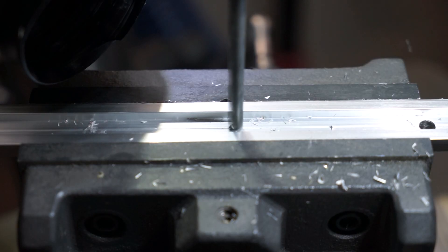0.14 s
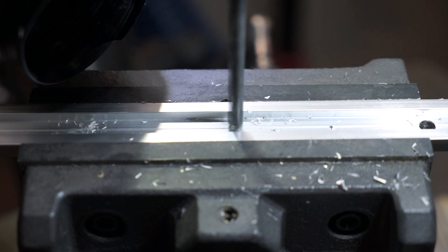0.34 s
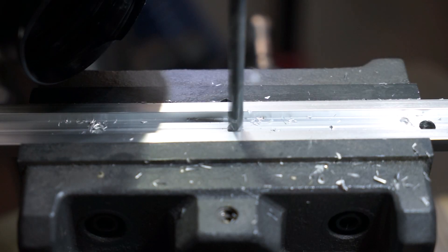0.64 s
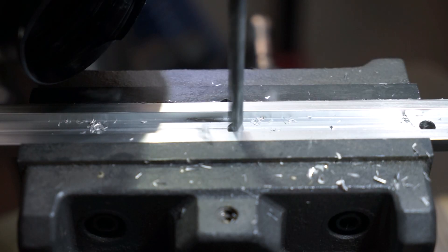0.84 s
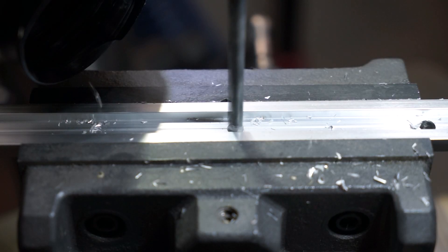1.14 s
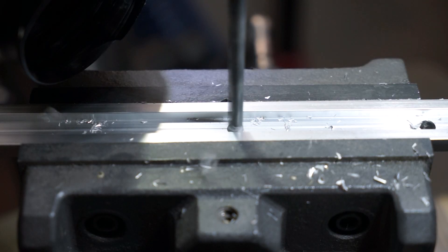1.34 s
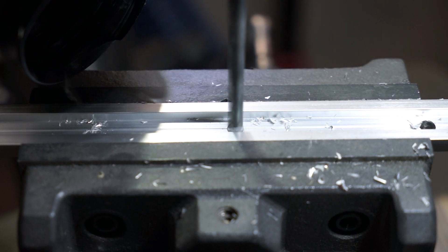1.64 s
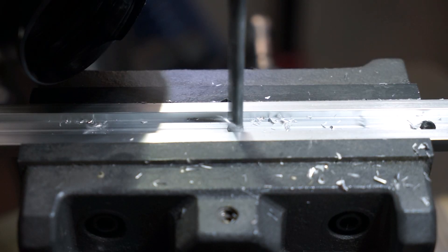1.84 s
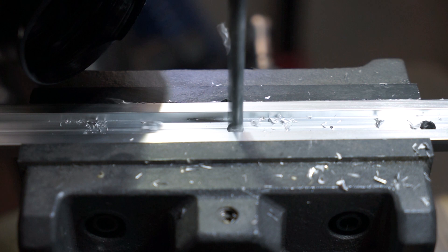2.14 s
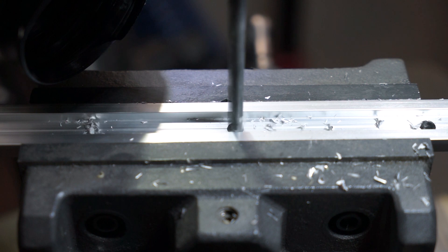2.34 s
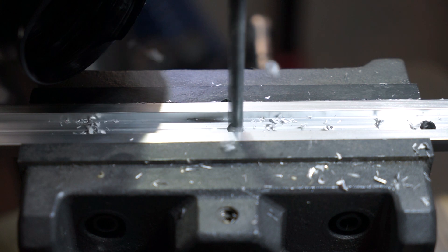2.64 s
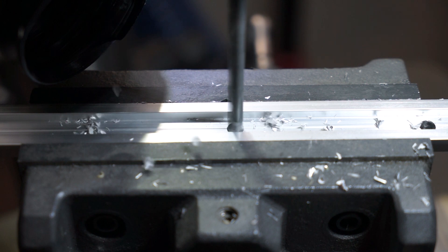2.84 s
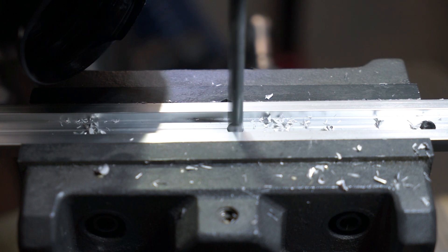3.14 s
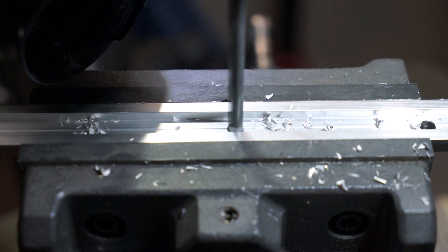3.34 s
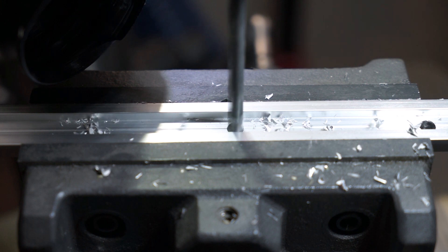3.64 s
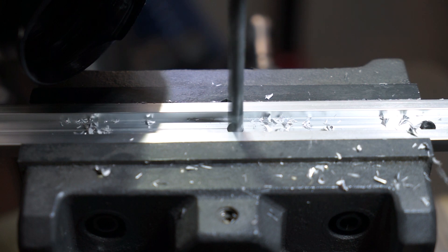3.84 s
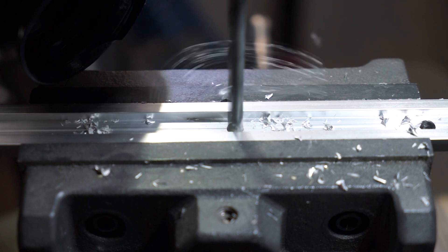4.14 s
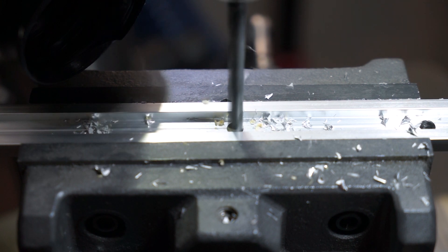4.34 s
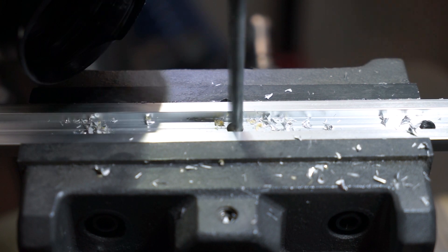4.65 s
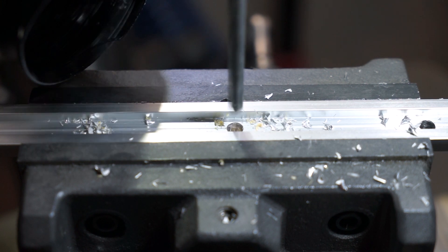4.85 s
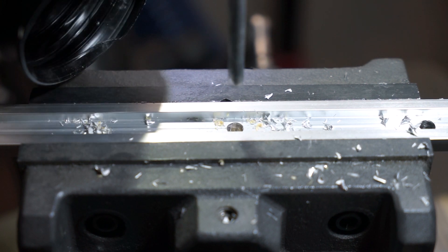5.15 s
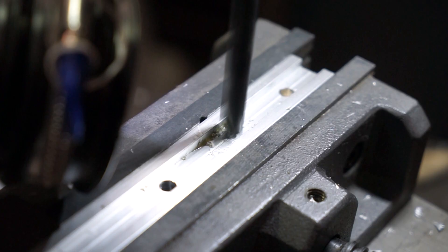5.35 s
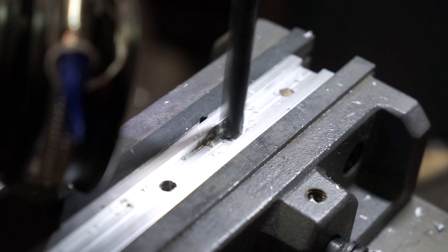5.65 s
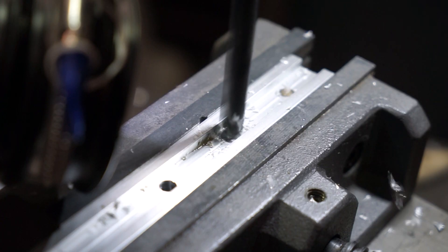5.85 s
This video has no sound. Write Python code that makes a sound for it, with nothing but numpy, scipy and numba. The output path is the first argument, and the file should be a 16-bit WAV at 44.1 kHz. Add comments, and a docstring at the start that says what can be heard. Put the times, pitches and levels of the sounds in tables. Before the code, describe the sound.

A drill press is already running at the start, heard close through a stereo microphone on its shaking workshop bench. Deep boom around 160 to 185 Hz wavers restlessly, leaning left, with motor hum and faint steady hiss. From about 0.3 to 1.4 seconds the bit takes hold of the aluminum rail, and a quiet grainy hiss and rasp build, far below the rumble. Small bright chip ticks scatter through, clearer around 2.0 to 2.3, 2.8 and 3.2 seconds. Near 4.1 a low growl swells; from 4.2 to 4.6 the bit breaks through with short chattering scrapes, squeals, rapid metallic knocks and thin high rings. By 4.85 the cutting has faded and the machine eases slightly, one last faint ring at 4.7. From 5.0 to 5.85 the sound crossfades to another bench position: fluttering boom near 245 Hz, a faint higher motor whine and a new tearing cut growing until the end.

```python
"""A belt-driven drill press bores an aluminium rail in a vise, heard by a microphone on the shaking bench.
Noise in resonances makes motor and belt rumble; drifting sines make the motor tones. Clicks through modes
of bit and rail make the cut, bright ticks the chips. Breaking through, the bit scrapes, rings and knocks.
In the last second the listening place blends over to another corner of the bench; steady hiss lies below."""
import sys
import numpy as np
from scipy import signal
from scipy.fft import rfft, irfft
from scipy.io import wavfile
from scipy.ndimage import uniform_filter1d
from numba import njit

SR = 44100
rng = np.random.default_rng(int(sys.argv[2]) if len(sys.argv) > 2 else 0)


def transcribe(signal):
    """Save signal, clipped to [-1, 1], as a 16-bit WAV file at the path in sys.argv[1]."""
    frames = np.atleast_2d(signal).T
    limited = np.clip(frames, -1, 1)
    pcm = np.round(limited * 32767).astype(np.int16)
    wavfile.write(sys.argv[1], SR, pcm)


N = 263718
T = np.arange(N) / SR

# Wavering level of the two boom modes, first place. Each row: time in seconds, lower mode level in dB,
# upper mode level in dB.
BOOM_LEVELS = [(0.0, -41.5, -26), (0.163, -22.5, -23), (0.29, -27.5, -29.5), (0.45, -24, -22),
               (0.499, -27, -27), (0.6, -27.5, -26), (0.991, -20.5, -19.5), (1.05, -41, -33),
               (1.12, -18.5, -35.5), (1.18, -53, -18), (1.31, -28.5, -32.5), (1.4, -37, -19),
               (1.51, -28, -30.5), (1.62, -39, -21), (1.81, -21.5, -24), (2.06, -35.5, -30.5),
               (2.11, -31.5, -33.5), (2.359, -31.5, -20.5), (2.54, -18, -29.5), (2.82, -40, -27.5),
               (2.96, -25, -25), (3.08, -38, -26.5), (3.25, -20.5, -24.5), (3.29, -45, -36.5),
               (3.35, -28.5, -24), (3.55, -30.5, -23), (3.66, -28.5, -25), (3.8, -29.5, -26.5),
               (4.0, -35.5, -25.5), (4.1, -40.5, -22), (4.25, -41, -22), (4.32, -33, -34),
               (4.4, -48, -22.5), (4.52, -32, -23.5), (4.63, -36.5, -36.5), (4.69, -29, -25.5),
               (4.81, -32.5, -33), (4.84, -46, -23.5), (4.99, -20.5, -25.5), (5.08, -42, -37),
               (5.23, -25, -23), (5.3, -35, -29.5)]
# The two boom modes. Each row: frequency in Hz, width in Hz.
BOOM_MODES = [(157.5, 9), (185, 24)]
# Wavering level of the boom, second place. Each row: time in seconds, level in dB.
BOOM_B_LEVELS = [(5.0, -29), (5.12, -27.5), (5.182, -31.5), (5.27, -24), (5.36, -22), (5.42, -32),
                 (5.5, -27), (5.58, -33), (5.65, -23), (5.72, -25), (5.776, -33.5), (5.84, -29.5),
                 (5.88, -24), (5.944, -23), (5.98, -27.5)]
# Frame modes, first place. Each row: frequency in Hz, width in Hz, level in dB, left minus right in dB,
# left-right likeness from -1 to 1.
FRAME_MODES = [(45, 39, -69.5, 9, .9), (107.2, 27.7, -39.5, 5, 0.85), (122, 14, -41.5, 6.5, 0.87),
               (246.7, 45, -39.5, 0.5, 1), (283, 40, -49.5, 0.5, 0.93), (372, 37, -65, 0.5, 0.56),
               (549, 27, -64.5, 2, 0.5), (593.6, 59, -56.5, 5, 1), (622.2, 23, -57.5, 4.5, 0.26),
               (679, 40, -60.5, -7, 0.25), (788, 50, -52, -2.5, 0.61), (738, 60, -60, 2, 0.75),
               (944, 140, -61.5, 1, 0.82), (1031, 40, -57, 1.5, .9), (1162, 220, -55.5, 3.5, 0.67),
               (1423, 140, -59, -2, 1), (1696, 210, -62.5, -2, -0.59), (2035, 310, -64.5, -3, -0.038),
               (2420, 870, -75, -0.5, 0.32)]
# Frame modes, second place. Each row: frequency in Hz, width in Hz, level in dB, left minus right in dB,
# left-right likeness from -1 to 1.
FRAME_B_MODES = [(45, 76, -53.5, 5, .8), (129, 57, -43.5, 6.5, 1), (176, 42, -40.5, 6.5, 1),
                 (287.5, 62, -32.5, 6, 0.13), (370, 66, -46, 3, 0.93), (478, 50, -56.5, -3.5, 0.41),
                 (559, 47, -59, -1, 0.4), (890, 310, -59, -2, .3), (1110, 410, -54, 11.5, 0.24),
                 (1158, 90, -54.5, 1, 0.32), (1650, 630, -56, -0.5, 0.57)]
# Motor tones. Each entry: pitch in Hz.
TONE_HZ = [119.8, 236.9, 298.8, 354.2, 471, 709.2, 769.8, 1872, 631, 1770]
# Motor tones, in the same order. Each row: level in dB, left minus right in dB, pitch waver in Hz,
# left phase lead in radians.
TONES = [(-39, 6, 2.5, 0.34), (-45.5, 8.5, 2.16, 1.3), (-55, 3.5, 2.8, 1.2), (-51, 2, 1.5, 0.65),
         (-70.5, -4, 1.8, 2.2), (-68, 7.5, 1.4, 1.1), (-54.5, -9.5, 2, 1.4), (-73.5, -6.5, 3.7, 0.21),
         (-62.5, 5.5, 3, 0.87), (-78, 2.5, 3.7, .5)]
# Workshop and microphone hiss. Each row: frequency in Hz, relative density in dB per Hz.
AIR_SPECTRUM = [(1200, -32.5), (2200, -1.5), (3500, -6), (5500, -10), (9000, -13.5), (12000, -18),
                (15700, -22.5)]
# Modes of bit and rail in the cut. Each row: frequency in Hz, width in Hz, relative level in dB.
BIT_MODES = [(4104, 400, -5.5), (4400, 890, -6), (5180, 320, -15.5), (7630, 500, -16.5), (3540, 600, -10),
             (2780, 1600, -3), (6100, 4000, -9.5), (1137, 140, 7), (1406, 214, 6.5), (675, 150, 7),
             (2610, 40, -14.5), (3430, 50, -14), (3850, 40, -13), (4180, 55, -13)]
# Modes of the next cut, second place. Each row: frequency in Hz, width in Hz, relative level in dB.
BIT_B_MODES = [(2090, 370, 4), (2640, 1400, 3.5), (3420, 1100, -5), (6000, 6000, -6.5),
               (11500, 5500, -14.5)]
# Modes of the rail's rasp. Each row: frequency in Hz, width in Hz, relative level in dB.
RAIL_MODES = [(2013, 34, -3), (1986, 150, -4.5), (1995, 440, -1.5), (1835, 67, -6.5), (2300, 110, -12)]
# Gain of the rasp. Each row: time in seconds, gain in dB.
RASP_LEVELS = [(0, -55), (.1, -73), (.5, -62.5), (.95, -59), (1.75, -62.5), (2.3, -63.5), (2.95, -60),
               (3.3, -66.5), (4.1, -62), (4.35, -63), (4.5, -64.5)]
# Modes that growl as the last metal thins. Each row: frequency in Hz, width in Hz, relative level in dB.
GROWL_MODES = [(1124, 220, 3.5), (1420, 250, -4.5)]
# Chips leaving the flutes and landing. Each row: start in seconds, near-peak level in dB, centre in Hz.
CHIPS = [(2.033, -56, 11600), (2.228, -56.5, 11300), (2.26, -60, 11500), (2.28, -59, 10600),
         (2.315, -64, 10800), (2.79, -58, 10700), (2.8394, -61, 9400), (3.169, -48.5, 12500),
         (3.207, -58, 11500), (3.4194, -63, 11000), (3.47, -69, 9520), (4.04, -58, 9100),
         (4.06, -62, 11000), (4.244, -58, 11500), (4.555, -56, 11500), (5.677, -60, 9280)]
# Scrapes of the bit breaking through and backing out. Each row: start in seconds, length in seconds,
# squeal centre in Hz, squeal level in dB, grind level in dB.
SCRAPES = [(4.22, .045, 5200, -66, -63), (4.275, .03, 4300, -55.5, -54), (4.295, .08, 5200, -55.5, -60),
           (4.412, .07, 4300, -57.5, -63), (4.485, .055, 4300, -62, -66), (4.54, .085, 4300, -55, -61)]
# Modes in the squeal. Each row: frequency in Hz, width in Hz, relative level in dB.
SQUEAL_MODES = [(3900, 260, 0), (4550, 300, 1), (5050, 300, -3), (5500, 450, -1), (4600, 3000, 3)]
# Thin rings of the rail. Each row: start in seconds, starting level in dB, frequency in Hz.
RINGS = [(4.293, -66, 13100), (4.553, -69, 12800), (4.552, -67, 6950), (4.725, -69, 12650)]
# Knocks of the lips on the burr. Each row: start in seconds, level in dB, frequency in Hz.
KNOCKS = [(4.2836, -47, 4600), (4.3205, -47, 5200), (4.3265, -45, 5450), (4.3345, -48, 5500),
          (4.3964, -53, 4250), (4.4228, -50, 4500), (4.447, -51, 4300), (4.4667, -52, 4100),
          (4.5091, -54, 4500), (4.5435, -48, 4000), (4.5495, -45, 4600), (4.558, -50, 4400),
          (4.5685, -44, 4050), (4.5735, -43, 4600), (4.588, -50, 4300), (4.594, -48, 4050),
          (4.599, -46, 4600), (4.609, -49, 4400)]

BOOM_B_HZ, BOOM_B_WIDTH_HZ = 245, 34.5
SUB_TOP_HZ, SUB_MID_S, SUB_DB_PER_S = 140, 2.3, -.74  # deepest frame modes sink, 0 dB at SUB_MID_S
UNLOAD_DB = -1.5  # frame and motor once the bit runs free
# share of the boom's waver, in dB, that the low frame modes of the second place follow
FOLLOW_SHARE, FOLLOW_REFERENCE_DB, FOLLOW_TOP_HZ = .55, -28, 600
TONE_SWELL_DB = 2.6
TONE_B_HZ, TONE_B_DB = 1180, -60  # motor tone of the second place
AIR_DB = -64
BITE_S, BITE_RISE_S = .3, 1.1  # the lips take hold
TOUCH_DB, HISS_AT_BITE_DB, HISS_DB_PER_S = -67.5, -63.5, .53  # before the bite; deep line and its slope
THROUGH_S, THROUGH_FADE_S, THROUGH_DB = 4.2, .18, -66  # tip is through, flutes still rub
LEAVE_S, LEAVE_FADE_S = 4.62, .22  # bit leaves the hole
HISS_B_DB, HISS_B_DB_PER_S = -75, 15  # next cut: at the start of the blend, growth
SPINDLE_HZ, CATCH_S = 39.9, 4.574  # turns a second, a moment when the burr catches the lip
HISS_THROB_DB, RASP_THROB_DB, CATCH_DB = .5, 2.5, 1.2  # swing up and down, once a turn
SING_HZ, SING_WIDTH_HZ, SING_AT_BITE_DB, SING_DB_PER_S = 4380, 60, -81.5, 4
GROWL_S, GROWL_SPREAD_S, GROWL_DB = 4.08, .19, -54.5
CHIP_S, CHIP_RISE_S = .04, .002
FAINT_CHIPS, FAINT_MIN_DB, FAINT_RANGE_DB, FAINT_HZ = 10, -66, 5, 9800
SQUEAL_WIDTH_HZ, GRIND_HZ, GRIND_WIDTH_HZ = 1700, 2600, 2600
CRACKLE_HZ, CRACKLE_WIDTH_HZ, CRACKLE_DB = 8000, 9000, -13  # dB against the grind
RING_T60_S = .2
KNOCK_RISE_S, KNOCK_T60_S, KNOCK_SPLIT = .0008, .03, .05  # split: mean spacing of the pair, share of pitch
BLEND_START_S, BLEND_S, FADE_OUT_POWER, FADE_IN_POWER = 4.986, .87, .7, .47
TOP_HZ = 15740


def undb(db):
    """Gain of a level in dB."""
    return 10 ** (np.asarray(db) / 20)


def unit(x):
    """Scaled to rms 1."""
    return x / np.sqrt(np.mean(x ** 2))


def noise():
    """White noise."""
    return rng.standard_normal(N)


@njit
def svf(x, hz, width):
    """State-variable band-pass, gain 1 at the centre."""
    y, band, low = np.empty(len(x)), 0., 0.
    g, damping = np.tan(np.pi * hz / SR), width / hz
    for i in range(len(x)):
        v = (band + g * (x[i] - low)) / (1 + g * (g + damping))
        band = 2 * v - band
        low = low + 2 * g * v
        y[i] = damping * v
    return y


def ring(x, hz, width):
    """A steep resonance: the band-pass twice."""
    hz, width = float(hz), float(width)
    return svf(svf(x, hz, width), hz, width)


def even_ring(hz, width):
    """Rumble in one mode with its own slow swell evened out."""
    x = ring(noise(), hz, width)
    span = int(.06 * SR)
    power = uniform_filter1d(uniform_filter1d(x ** 2, span), span)
    return unit(svf(x / np.sqrt(power), float(hz), 140.))


def walk(rate_hz):
    """Random levels held 1 / rate_hz seconds and slewed twice; spread near 1."""
    k = int(SR / rate_hz)
    held = np.repeat(rng.standard_normal(N // k + 3), k)
    return 1.354 * uniform_filter1d(uniform_filter1d(held, k), k)[k:N + k]


def curve(s, db):
    """Gain along a table, its corners rounded."""
    return uniform_filter1d(undb(np.interp(T, s, db)), int(.014 * SR))


def ramp(s, length_s):
    """0 before s, 1 after the length, straight between."""
    return np.clip((T - s) / length_s, 0, 1)


def pan(db):
    """Left and right gains, left louder by db."""
    return undb(np.array([[db], [-db]]) / 2)


def pair(like, source):
    """Left and right from a shared and an opposed draw of the source."""
    like = np.clip(like, -1, 1)
    shared = np.sqrt((1 + like) / 2) * source()
    opposed = np.sqrt((1 - like) / 2) * source()
    return shared + opposed * np.array([[1], [-1]])


def grit(share, spread_db):
    """Sparse clicks of uneven size; share is the chance of one per sample."""
    x = 1. * (rng.random(N) < share)
    count = int(x.sum())
    size_db = spread_db * np.minimum(rng.exponential(size=count), 5)
    x[x > 0] = rng.standard_normal(count) * undb(size_db)
    return unit(x)


def throb(db):
    """Gain that peaks once a turn of the spindle."""
    return undb(db * np.cos(2 * np.pi * SPINDLE_HZ * (T - CATCH_S)))


def tear(modes):
    """Dense uneven clicks of tearing metal ring each mode, each wavering alone."""
    clicks, out = grit(.06, 2.2), 0
    for hz, width, db in modes:
        shifted = np.roll(clicks, rng.integers(N))
        out = out + undb(db + walk(10)) * unit(ring(shifted, hz, width))
    return out


def frame(modes):
    """Belt and bearing rumble shakes every mode of the frame on its own."""
    out = 0
    for hz, width, db, lr_db, like in modes:
        out = out + undb(db) * pan(lr_db) * pair(like, lambda: unit(ring(noise(), hz, width)))
    return out


def frame_split(modes, split_hz):
    """Frame rumble of the modes below the split, and of the rest."""
    low = frame([m for m in modes if m[0] < split_hz])
    high = frame([m for m in modes if m[0] >= split_hz])
    return low, high


def boom():
    """Booming low modes, first place: noise in two resonances, their level wavering quickly along the table."""
    s, *levels = np.transpose(BOOM_LEVELS)
    return pan(4.66) * sum(even_ring(*mode) * curve(s, db) for mode, db in zip(BOOM_MODES, levels))


def motor():
    """Mains hum and rotor tones, each drifting a little in pitch and strength."""
    out = 0
    for hz, (db, lr_db, waver_hz, lead) in zip(TONE_HZ, TONES):
        phase = 2 * np.pi * (np.cumsum(hz + waver_hz * walk(9)) / SR + rng.random())
        level = np.sqrt(2) * undb(db + TONE_SWELL_DB * walk(14))
        out = out + level * pan(lr_db) * np.sin([phase + lead, phase])
    return out


def air():
    """Steady workshop and microphone hiss: shaped noise, nearly unrelated left and right."""
    hz, db = np.transpose(AIR_SPECTRUM)
    bins_hz = np.fft.rfftfreq(N, 1 / SR)
    gain = undb(np.interp(np.log(bins_hz + 1), np.log(hz), db, left=-80))
    return undb(AIR_DB) * pair(.27, lambda: unit(irfft(rfft(noise()) * gain, N)))


def bit_hiss():
    """Torn metal rings bit and rail, under a bright band of grit and noise."""
    bright = unit(svf(grit(.047, 2.5) + 1.5 * noise(), 8700., 9800.))
    return tear(BIT_MODES) + undb(-8 + 1.3 * walk(13)) * bright


def cutting():
    """The lips tear the metal: hiss, rasp of the rail, a mode that sings louder with time, a late growl."""
    bite = ramp(BITE_S, BITE_RISE_S)
    deep_db = HISS_AT_BITE_DB + HISS_DB_PER_S * (T - BITE_S)
    hiss_db = TOUCH_DB + bite * (deep_db - TOUCH_DB)
    hiss_db = hiss_db + ramp(THROUGH_S, THROUGH_FADE_S) * (THROUGH_DB - deep_db)
    hiss = pair(.28, bit_hiss) * undb(hiss_db + walk(8)) * throb(HISS_THROB_DB)

    rasp = pair(.49, lambda: tear(RAIL_MODES)) * throb(RASP_THROB_DB) * curve(*np.transpose(RASP_LEVELS))

    sing_gain = undb(SING_AT_BITE_DB + SING_DB_PER_S * (T - BITE_S)) * bite * (1 - ramp(THROUGH_S, .05))
    sing = sing_gain * pair(.4, lambda: tear([(SING_HZ, SING_WIDTH_HZ, 0)]))

    growl_gain = undb(GROWL_DB) * np.exp(-((T - GROWL_S) / GROWL_SPREAD_S) ** 2)
    growl = growl_gain * pair(.5, lambda: tear(GROWL_MODES))
    return (hiss + rasp + sing + growl) * (1 - ramp(LEAVE_S, LEAVE_FADE_S))


def chips():
    """Each chip is a short shower of tiny bright ticks."""
    ticks = pair(.5, lambda: undb(2 * walk(120)) * grit(.15, 1.8))
    # small chips at random moments of the cut
    faint = [(BITE_S + when * (THROUGH_S - BITE_S), FAINT_MIN_DB + FAINT_RANGE_DB * size, FAINT_HZ)
             for when, size in rng.random((FAINT_CHIPS, 2))]
    out, u = np.zeros((2, N)), T[:int(3 * CHIP_S * SR)]
    shape = (1 - np.exp(-u / CHIP_RISE_S)) * np.exp(-(u / CHIP_S) ** 2.2)
    for s, db, hz in CHIPS + faint:
        at = slice(int(s * SR), int(s * SR) + len(u))
        x = np.array([svf(side[at].copy(), float(hz), 5000.) for side in ticks])
        near_peak = np.percentile(np.abs(x[:, :len(u) // 4]), 97)
        out[:, at] += undb(db) * shape * x / near_peak
    return out


def rub(s, length_s):
    """Envelope of a contact that holds for the length and lets go fast."""
    u = np.clip(T - s, 0, None)
    return (1 - np.exp(-u / .006)) * np.exp(-(u / length_s) ** 4)


def scrapes():
    """Stick-slip against the burr, catching once a turn: a squeal over a crackling grind."""
    chatter = undb(2.2 * walk(160)) * throb(CATCH_DB)

    def slip():
        return chatter * grit(.058, 1.1)

    def band(hz, width):
        return pair(.99, lambda: unit(ring(ring(slip(), hz, width), hz, width)))

    def squeal_side(hz):
        modes = sum(undb(db) * unit(ring(slip(), f, width)) for f, width, db in SQUEAL_MODES)
        return unit(ring(modes, hz, SQUEAL_WIDTH_HZ))

    grind = band(GRIND_HZ, GRIND_WIDTH_HZ) + undb(CRACKLE_DB) * band(CRACKLE_HZ, CRACKLE_WIDTH_HZ)
    squeals = {hz: pair(.71, lambda: squeal_side(hz)) for hz in sorted({row[2] for row in SCRAPES})}
    out = 0
    for s, length_s, hz, squeal_db, grind_db in SCRAPES:
        out = out + rub(s, length_s) * (undb(grind_db) * grind + undb(squeal_db) * squeals[hz])
    return out


def knocks():
    """Short metallic rings, each a close pair of modes with its own phase at either ear."""
    out, u = np.zeros((2, N)), T[:int(KNOCK_T60_S * SR)]
    shape = (1 - np.exp(-u / KNOCK_RISE_S)) * np.exp(-np.log(1000) * u / KNOCK_T60_S)
    for (s, db, hz), (second_gain, b, lead) in zip(KNOCKS, rng.random((len(KNOCKS), 3))):
        phase = 2 * np.pi * hz * u + np.array([[lead], [-lead]])
        pitch = 1 + KNOCK_SPLIT * (.5 + b)
        tones = np.sin(phase) + second_gain * np.sin(pitch * phase + 2 * np.pi * b)
        out[:, int(s * SR):int(s * SR) + len(u)] += undb(db) * shape * tones
    return out


def rail_rings():
    """Thin rings of the rail: narrow noise dying away, alike left and right."""
    out = 0
    for s, db, hz in RINGS:
        decay = (T > s) * np.exp(-np.log(1000) * np.clip(T - s, 0, None) / RING_T60_S)
        out = out + undb(db) * decay * unit(svf(noise(), float(hz), 250.))
    return out


def boom_b():
    """Booming low mode, second place: noise in one resonance, its level wavering along the table."""
    rumble = pair(.88, lambda: even_ring(BOOM_B_HZ, BOOM_B_WIDTH_HZ))
    return curve(*np.transpose(BOOM_B_LEVELS)) * rumble * pan(4.6)


def cutting_b():
    """The next cut, second place: torn metal rings louder as the bit digs in."""
    level_db = HISS_B_DB + HISS_B_DB_PER_S * (T - BLEND_START_S)
    return pair(.15, lambda: tear(BIT_B_MODES)) * undb(level_db)


def motor_b():
    """A motor tone that stands out at the second place: a sine wavering in pitch and level."""
    phase = 2 * np.pi * np.cumsum(TONE_B_HZ + 5 * walk(15)) / SR
    return undb(TONE_B_DB + 2 * walk(20)) * np.sqrt(2) * np.sin(phase)


def first_place():
    """Frame, motor, boom and cut; frame and motor ease as the bit leaves."""
    sub, body = frame_split(FRAME_MODES, SUB_TOP_HZ)
    machine = sub * undb(SUB_DB_PER_S * (T - SUB_MID_S)) + body + motor()
    return machine * undb(UNLOAD_DB * ramp(LEAVE_S, LEAVE_FADE_S)) + boom() + cutting()


def second_place():
    """Frame, boom, cut and tone; the low frame modes follow part of the boom's wavering level."""
    s, db = np.transpose(BOOM_B_LEVELS)
    low, high = frame_split(FRAME_B_MODES, FOLLOW_TOP_HZ)
    waver = curve(s, FOLLOW_SHARE * (db - FOLLOW_REFERENCE_DB))
    return low * waver + high + boom_b() + cutting_b() + motor_b()


def scene():
    """Two listening places that cross over, with hiss, chips and breakthrough outside the blend."""
    u = ramp(BLEND_START_S, BLEND_S)
    blend = (1 - u) ** FADE_OUT_POWER * first_place() + u ** FADE_IN_POWER * second_place()
    return blend + air() + chips() + scrapes() + knocks() + rail_rings()


def record(dry):
    """The recorder cuts the top with a steep low-pass."""
    return signal.sosfilt(signal.ellip(16, .2, 60, TOP_HZ, fs=SR, output="sos"), dry)


dry = scene()
out = record(dry)
transcribe(out)
```